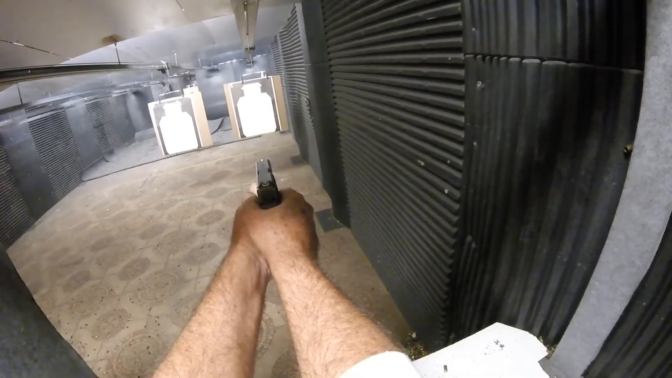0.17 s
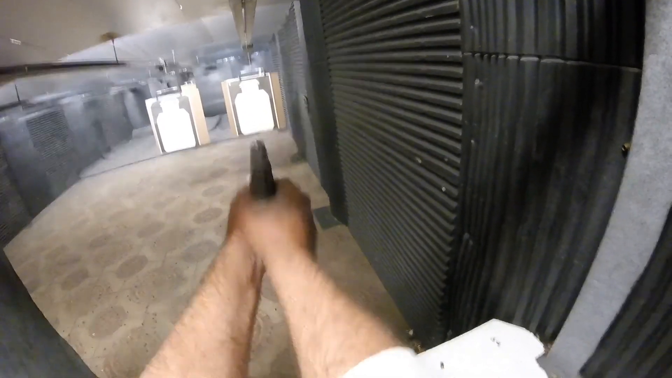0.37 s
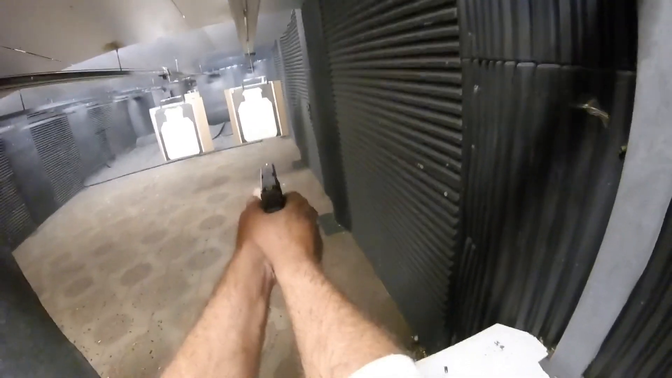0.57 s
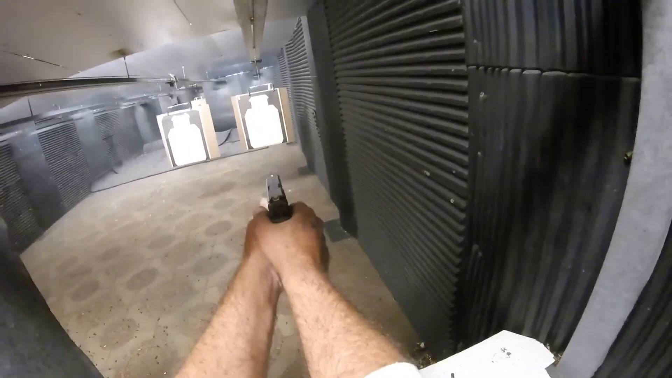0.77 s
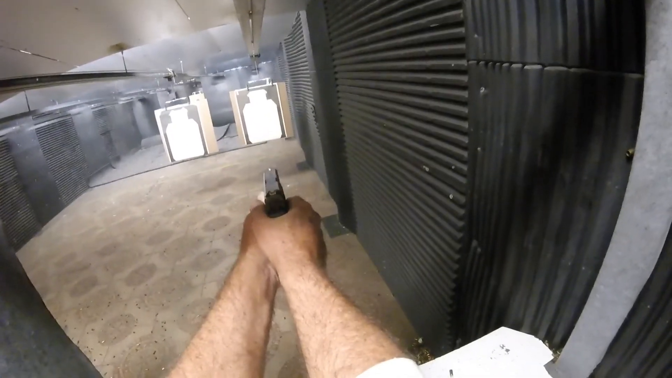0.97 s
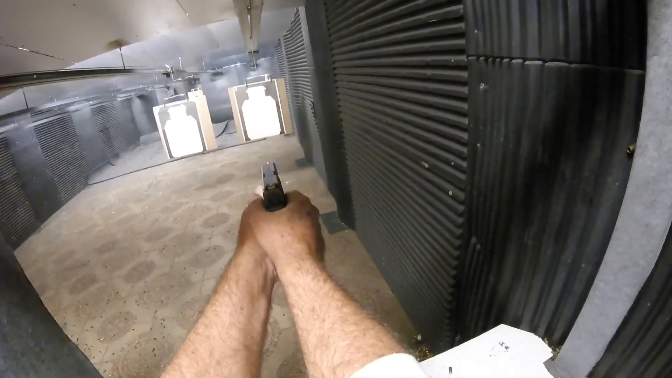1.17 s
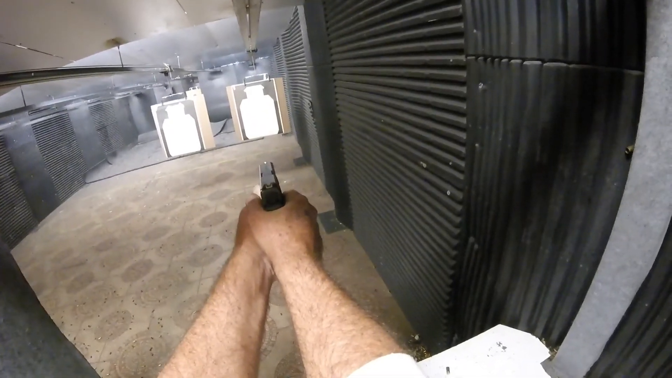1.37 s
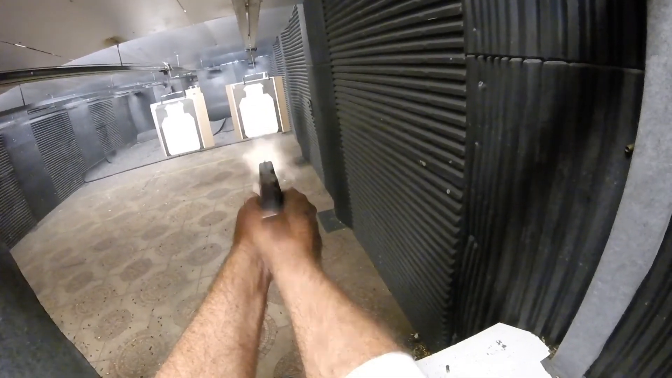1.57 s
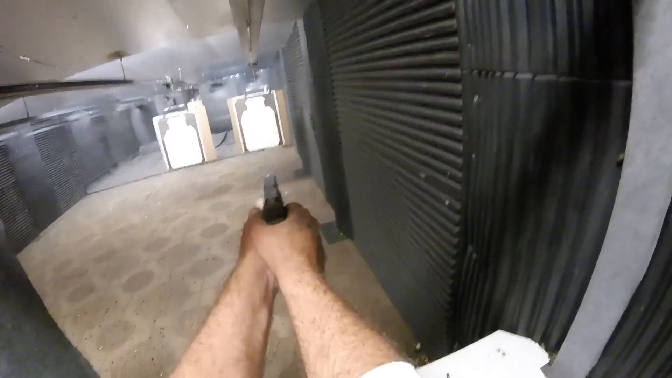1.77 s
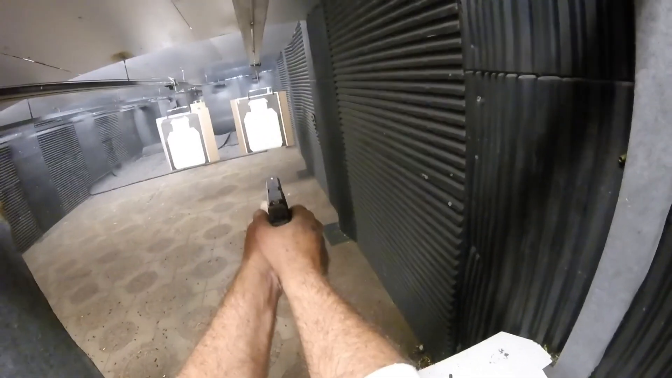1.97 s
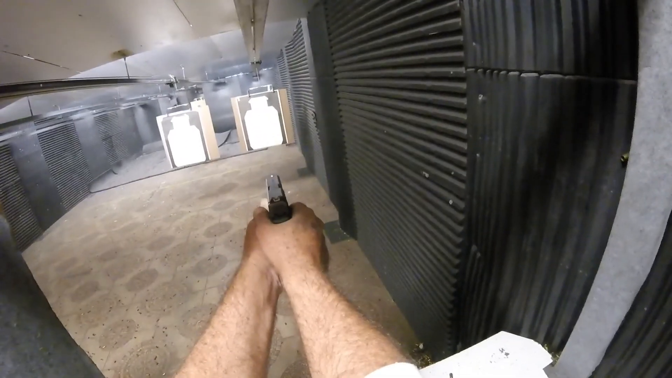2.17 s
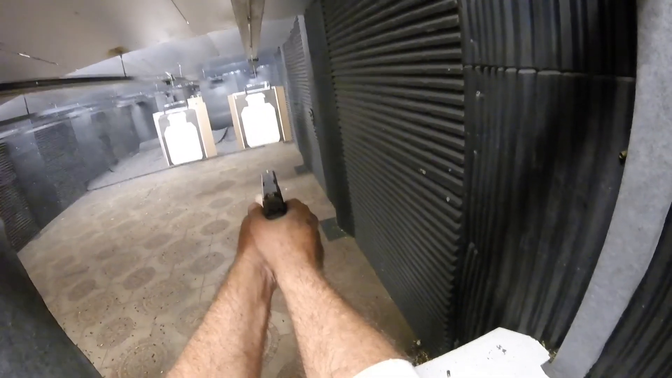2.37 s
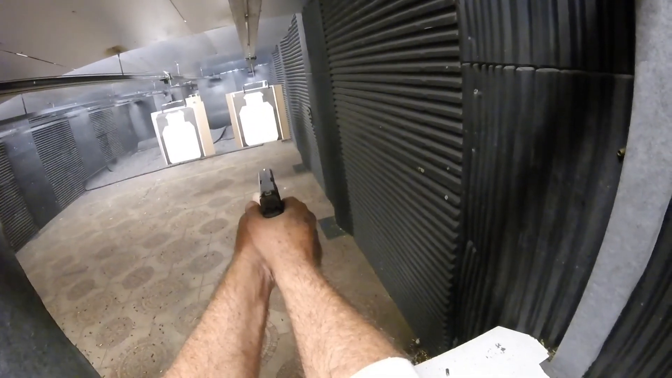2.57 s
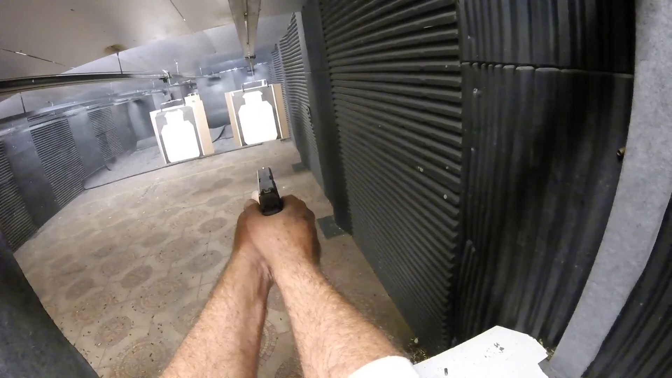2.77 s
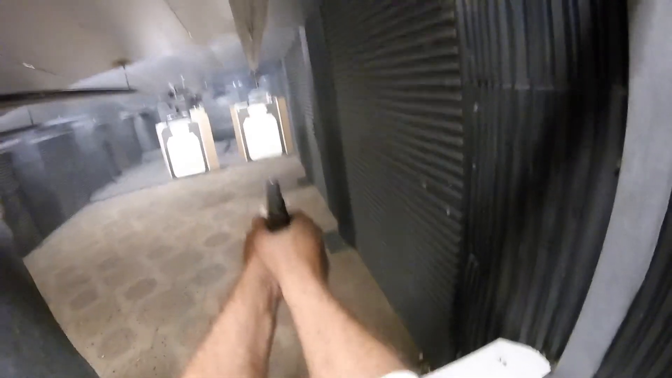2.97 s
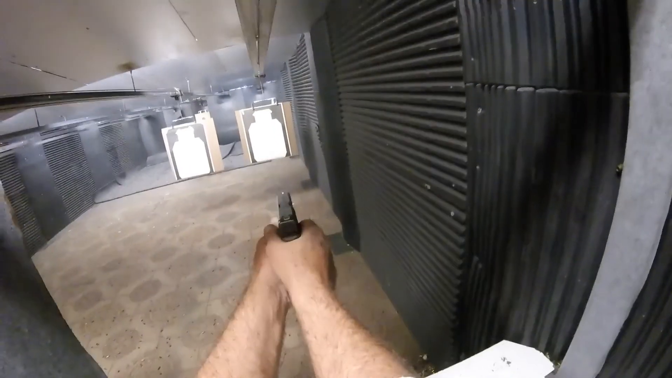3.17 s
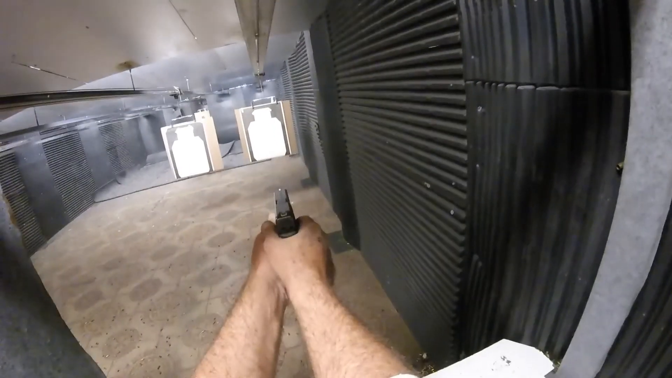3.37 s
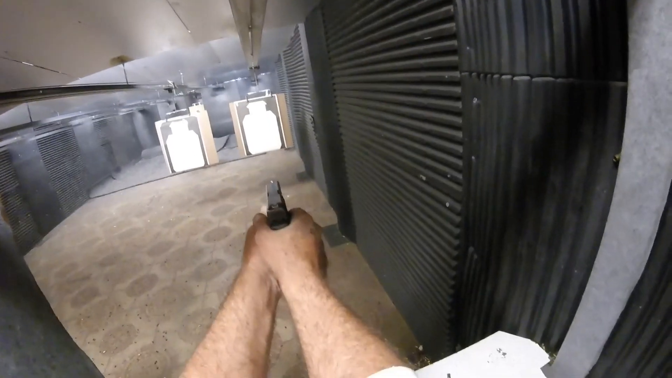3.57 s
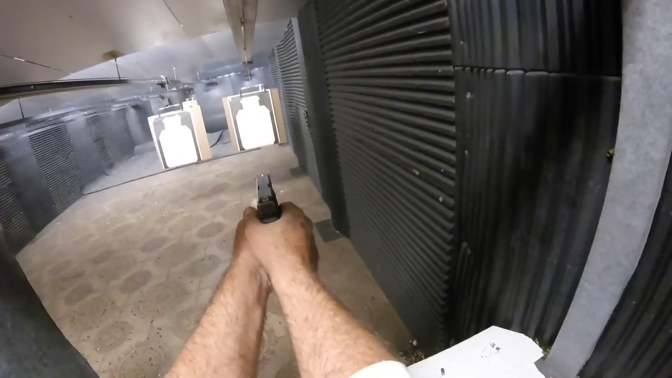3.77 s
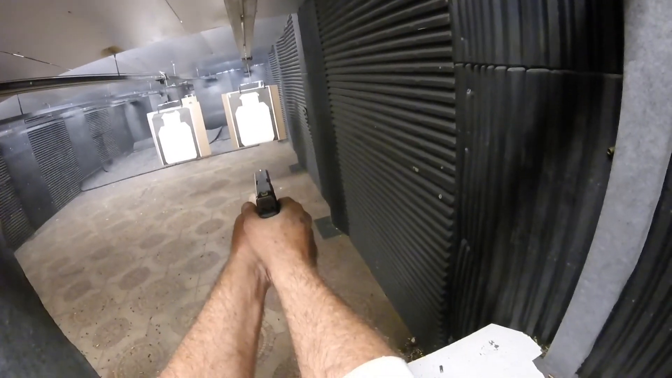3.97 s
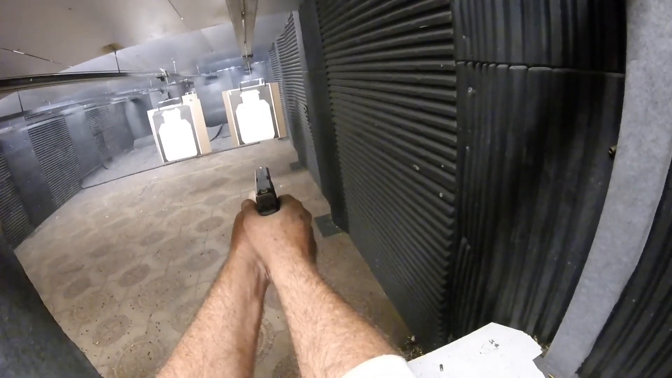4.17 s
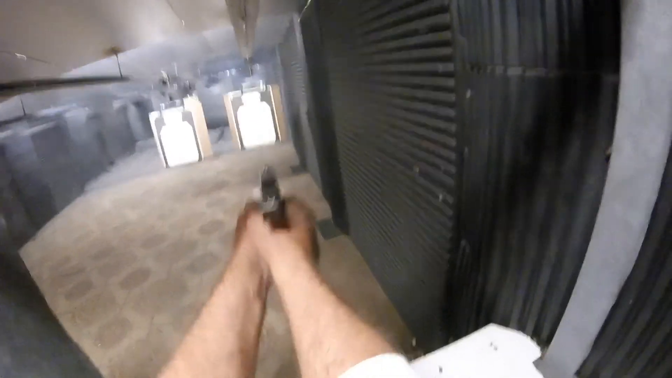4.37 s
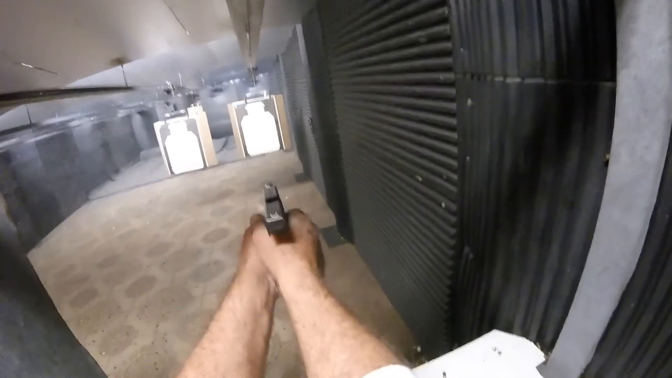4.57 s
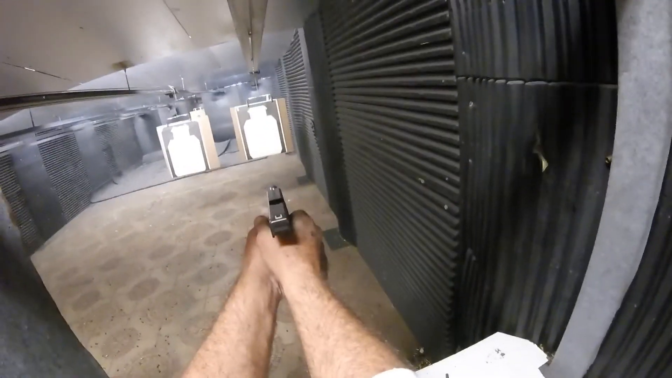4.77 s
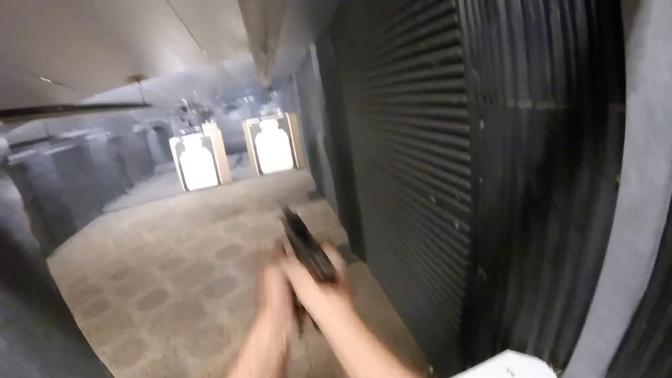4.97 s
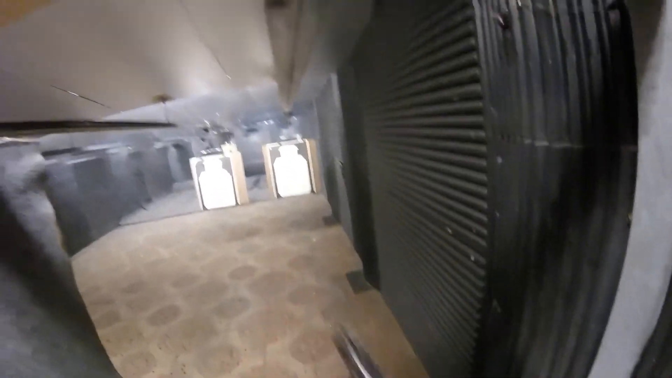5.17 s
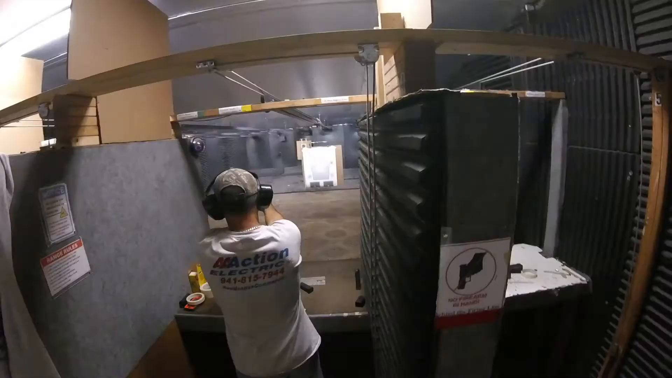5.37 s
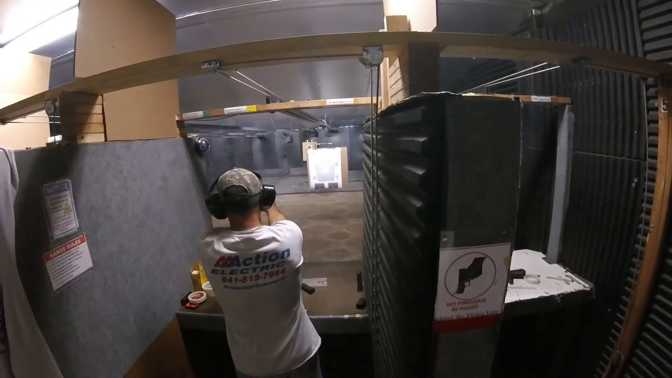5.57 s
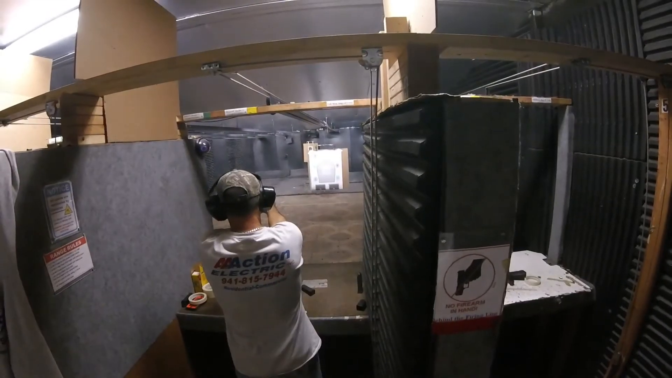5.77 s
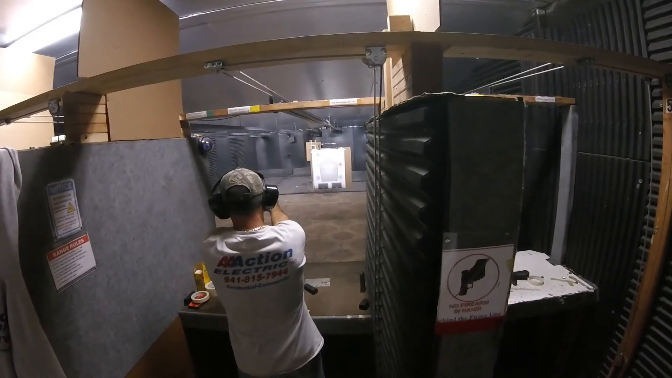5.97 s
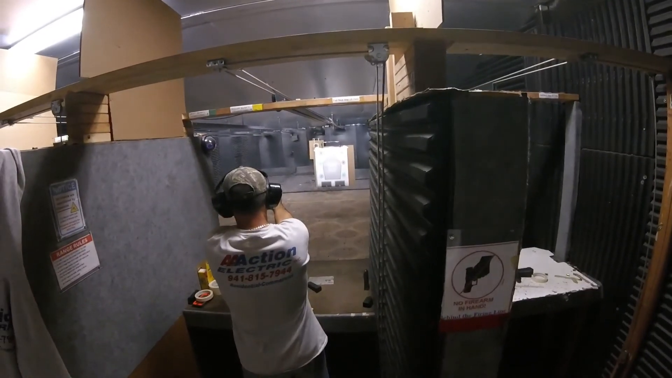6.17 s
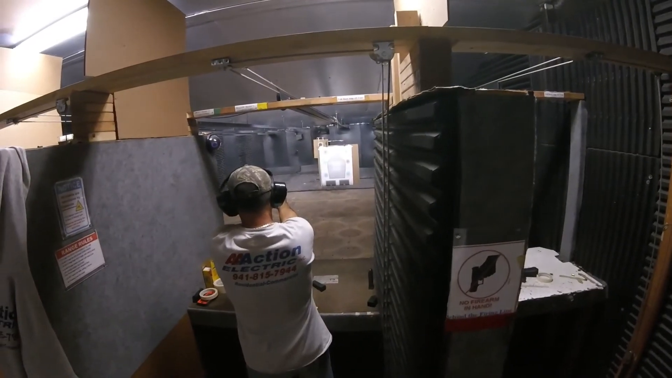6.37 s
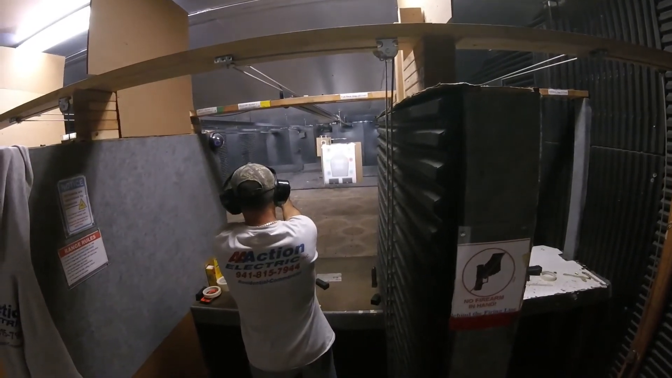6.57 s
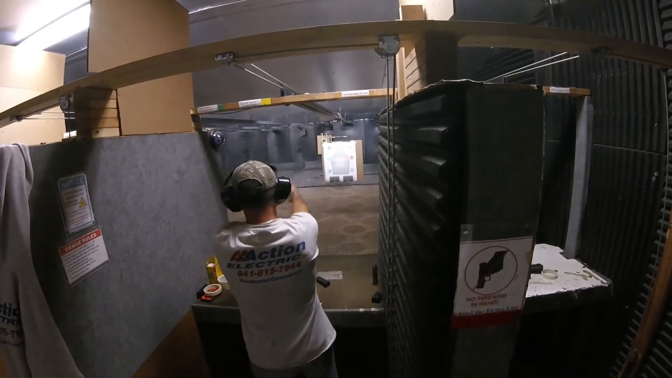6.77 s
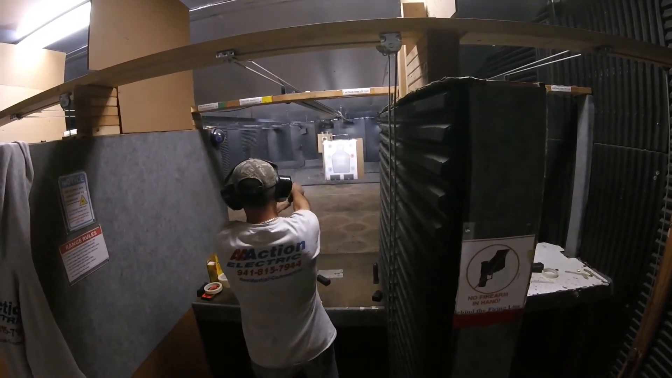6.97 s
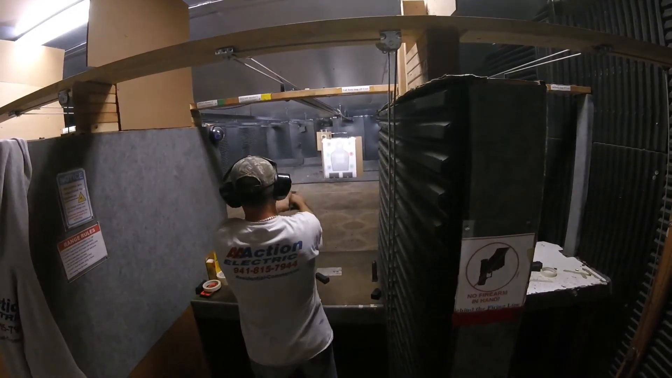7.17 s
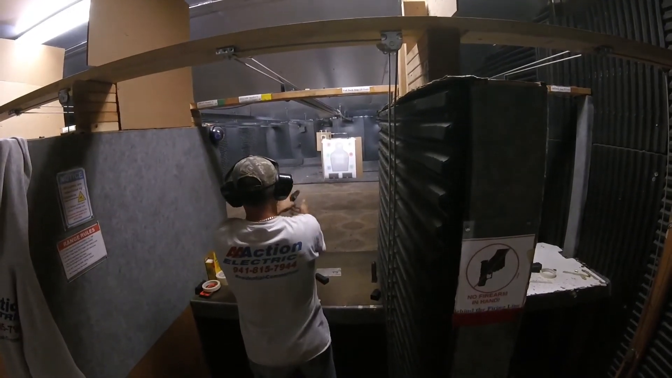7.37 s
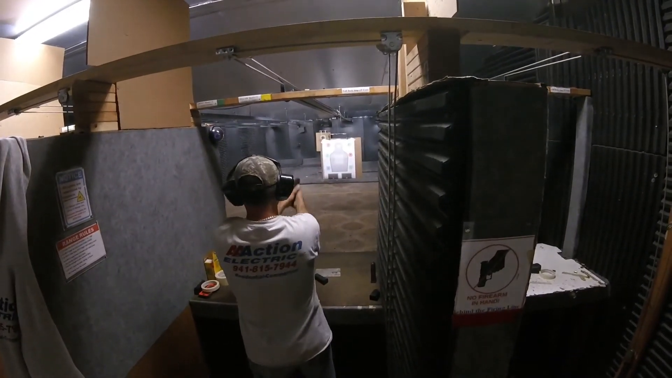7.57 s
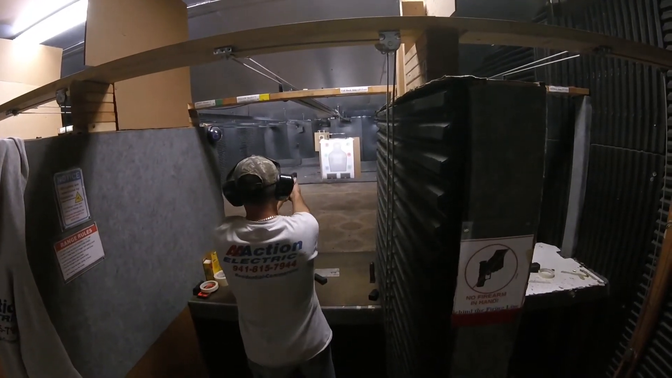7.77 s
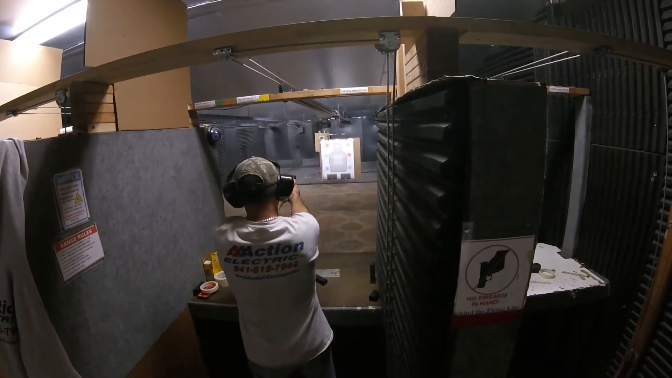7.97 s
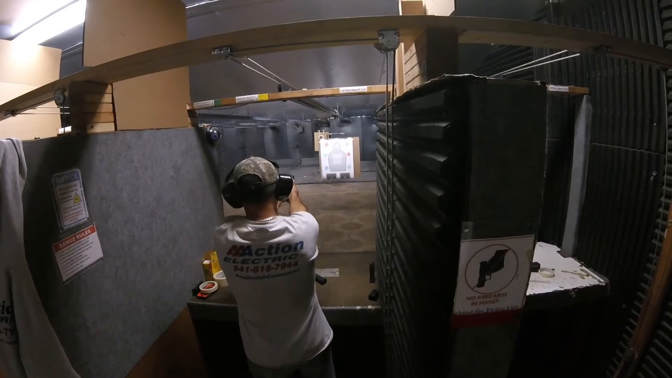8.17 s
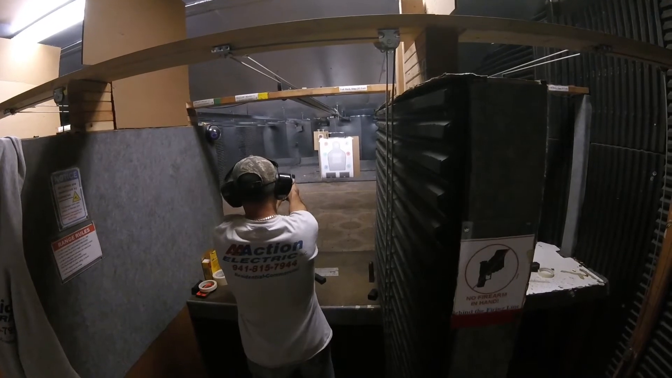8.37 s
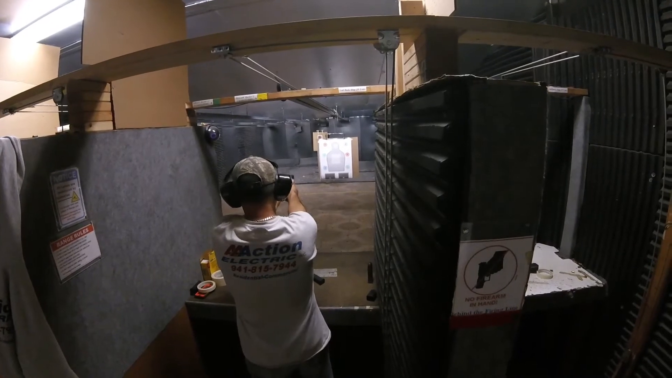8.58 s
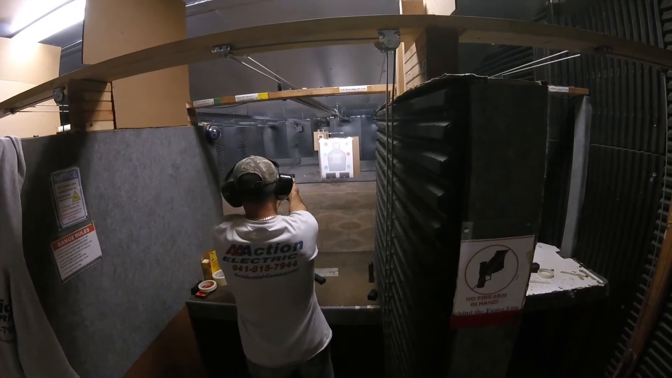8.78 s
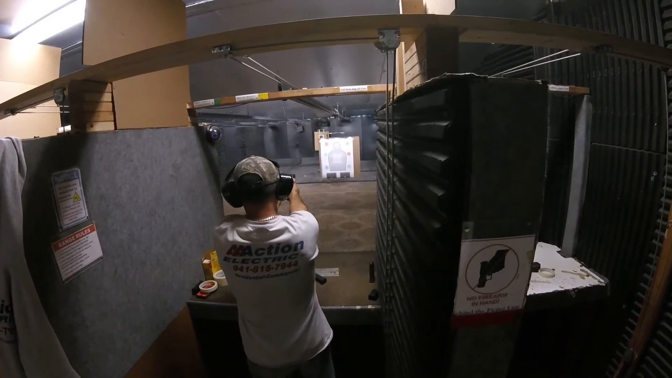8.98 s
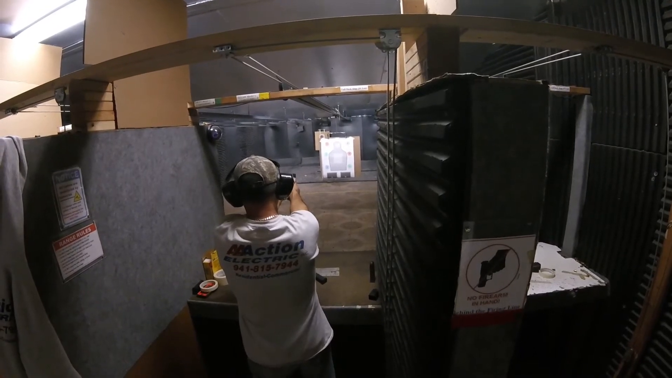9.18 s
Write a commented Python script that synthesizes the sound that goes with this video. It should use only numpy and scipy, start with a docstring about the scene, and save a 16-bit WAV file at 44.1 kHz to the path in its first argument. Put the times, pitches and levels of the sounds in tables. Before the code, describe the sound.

Four evenly spaced handgun shots crack and echo in a hard indoor range, cases tick on the floor, then a magazine and slide clack over fan hum.

```python
"""The echo of a pistol shot just fired dies over ventilation, then four more shots follow in a hard-walled indoor range.
Each blast stuns the head-worn microphone; on waking it takes in crack, slap, thump and echo, all shaped noise or sines.
Gain control lets the ventilation back as the echo fades. Spent cases tick on the floor: noise clicks with a brass ring.
A second microphone, behind the booth, then hears a magazine seated and the slide racked over the fan hum:
noise bursts and struck modes, with a room echo around them."""
import sys
import numpy as np
from scipy import signal
from scipy.fft import rfft, irfft
from scipy.io import wavfile
from scipy.ndimage import uniform_filter1d

SR = 44100
rng = np.random.default_rng(int(sys.argv[2]) if len(sys.argv) > 2 else 0)


def ratio_of_db(decibels):
    """Turn decibels (scalar or array-like) into linear amplitude factors; 0 dB maps to 1."""
    return 10 ** (np.asarray(decibels, float) / 20)


def materialize(psi):
    """Save the field psi as 16-bit PCM at rate SR to the path in sys.argv[1].

    A 1-D psi becomes a single channel; in a 2-D psi each row is a channel.
    """
    bounded = np.clip(np.atleast_2d(psi).T, -1, 1)
    quanta = np.round(bounded * 32767).astype(np.int16)
    wavfile.write(sys.argv[1], SR, quanta)


N = 406161  # length in samples
CUT_S = 5.389  # the place moves from the firing line to behind the booth

# Shots. Each row: blast in seconds, deafness of the microphone in seconds, level in dB, slap echo in dB to the crack.
SHOTS = [(-1.08, .045, 0, -6), (.354, .0513, 0, -8), (1.602, .0414, 0, -2.5), (2.850, .0415, 1.2, -14),
         (4.290, .039, 0, -6)]
# Spectrum of the long echo. Each row: frequency in Hz, density in dB per Hz.
ECHO = [(24, -22), (50, -7), (100, 0), (150, -5), (205, -6), (270, -3.5), (400, -5), (600, -3.5),
        (1000, -5), (1400, -8), (1650, -11), (2000, -12.5), (3200, -15), (5850, -23), (6620, -35),
        (9700, -45), (11800, -58), (13000, -100)]
# Decay of the long echo. Each row: frequency in Hz, time to fall 60 dB in seconds.
ECHO_T60 = [(60, .5), (120, .5), (200, .9), (280, 1.5), (350, 1.75), (700, 1.7), (1500, 1.85), (3500, 1.53),
            (6000, 1.35), (9000, .9), (13000, .6)]
# Resonances of the range. Each row: frequency in Hz, width in Hz, lift in dB.
ROOM_PEAKS = [(279, 14, 4), (338, 14, 5), (377, 20, 5), (495, 18, 5), (533, 18, 5), (619, 18, 4),
              (672, 18, 4), (798, 18, 3), (967, 16, 5), (1159, 20, 3)]
# Spectrum of the close booth reflections. Each row: frequency in Hz, density in dB per Hz.
CRACK = [(59, -36), (100, -6), (843, 0), (1430, -7), (2750, -6), (3850, -12), (5630, -10), (9740, -28),
         (12800, -43), (15500, -69)]
# Ventilation hiss at the firing line. Each row: frequency in Hz, density in dB per Hz.
NEAR_AIR = [(12, -39), (20, -2), (58, 0), (100, -4), (130, -10), (200, -23), (400, -24), (1000, -35),
            (1490, -36), (2000, -50), (2750, -55), (7000, -66), (12000, -74), (15600, -100)]
# Hum at the firing line. Each row: frequency in Hz, width in Hz, level in dB.
NEAR_HUM = [(60, 15, -50)]
# Whine at the firing line. Each row: frequency in Hz, width in Hz, level in dB before WHINE_LEVEL.
NEAR_WHINE = [(1437, 12, -60), (1513, 20, -64)]
# Course of the whine. Each row: time in seconds, gain in dB.
WHINE_LEVEL = [(0, -4), (.35, -4), (3.55, -1), (3.85, 3), (4.3, 2), (5.3, 0)]
# Spent cases and small parts landing. Each row: start in seconds, level in dB, brass ring in dB to the click.
TICKS = [(.089, -53, -18), (.195, -51, -9), (.884, -45, -40), (.985, -46, -40), (1.0445, -30, -42),
         (2.314, -31, -26), (2.637, -51, -22), (2.709, -43, -22), (2.797, -54, -30), (3.586, -33, -34),
         (3.895, -49, -10), (4.12, -61, -30), (5.0444, -26, -26), (5.239, -50, -30)]
# Spectrum of the landing click. Each row: frequency in Hz, density in dB per Hz.
TICK = [(700, -30), (1200, -8), (2000, 0), (3200, 0), (5500, -1), (6500, -12), (9800, -26), (11000, -42),
        (14000, -70)]
# Modes of a brass case. Each row: frequency in Hz, level in dB, time to fall 60 dB in seconds.
BRASS = [(5250, -6, .25), (5800, -4, .1), (6100, -8, .2), (11380, -14, .35), (11470, -21, .2)]
# Cases rolling out after a bounce. Each row: start in seconds, level in dB, time to fall 60 dB in seconds.
ROLLS = [(.089, -62, 1.2), (.195, -60, 1.0), (3.895, -62, .8), (5.05, -52, 1.0)]
# Spectrum of the rolling. Each row: frequency in Hz, density in dB per Hz.
ROLL = [(2000, -30), (4200, -8), (5000, 0), (6100, 0), (6800, -12), (9000, -18), (12000, -40)]
# Small clicks just as the microphone is stunned. Each row: start in seconds, level in dB.
ARRIVALS = [(2.849, -44), (4.289, -46)]
# Ventilation hiss behind the booth. Each row: frequency in Hz, density in dB per Hz.
FAR_AIR = [(120, -30), (170, -5), (290, -8), (420, -10), (650, -13), (1000, -18), (2200, -25), (3300, -31),
           (5000, -36), (7300, -36), (9700, -42), (12000, -46), (15000, -52)]
# Fan tones behind the booth. Each row: frequency in Hz, width in Hz, level in dB before FAR_LEVEL.
FAR_TONES = [(30, 9, 1), (68, 30, -6), (100, 30, -12), (136, 16, -7), (511, 8, -32)]
# Level of the background behind the booth: it drops just after the slide goes home, then slowly comes back.
# Each row: time in seconds, gain in dB.
FAR_LEVEL = [(5.39, -38), (7.2, -38.5), (7.35, -45), (7.7, -43), (9.2, -40.5)]
# Metal sliding on metal. Each row: start in seconds, seconds to the peak, seconds after it, peak in dB.
SCRAPES = [(6.425, .02, .024, -57), (7.104, .02, .05, -31), (7.185, .008, .048, -31)]
# Magazine seated, slide back, slide home. Each row: start in seconds, level in dB, rise in seconds,
# time for the clatter to fall 60 dB in seconds, strongest frequency in Hz, low knock in dB, ring in dB.
CLACKS = [(6.47, -17, .003, .13, 2800, -27, -6), (7.173, -10, .004, .045, 4500, -10, -6),
          (7.295, -11.5, .0015, .065, 3600, -19, -4)]
# Spectrum of parts clattering. Each row: frequency in Hz, density in dB per Hz.
CLATTER = [(530, -40), (860, -20), (1400, -10), (2200, -9), (3400, -7), (6000, -9), (7000, -22),
           (10000, -27), (11300, -38), (12300, -65), (14000, -80)]
# Spectrum of the low knock. Each row: frequency in Hz, density in dB per Hz.
KNOCK = [(150, -30), (300, -10), (500, -9), (700, 0), (1200, -4), (2500, -40)]
# Modes struck by the magazine. Each row: frequency in Hz, level in dB, time to fall 60 dB in seconds.
MAGAZINE = [(1300, -9, .03), (1920, -9, .03), (2380, -3, .04), (2570, -5, .04), (2920, 0, .05),
            (3180, -3, .04), (3530, -2, .03), (4060, -5, .04), (4480, -3, .06), (5050, -12, .02),
            (5850, -6, .025)]
# Modes struck by the slide going back. Each row: frequency in Hz, level in dB, time to fall 60 dB in seconds.
FRAME = [(800, -3, .025), (1200, -5, .03), (1780, -3, .04), (2270, -5, .03), (2760, -3, .035),
         (3380, -2, .06), (4200, -3, .025), (4600, 0, .025), (5820, 0, .025)]
# Modes struck by the slide going home. Each row: frequency in Hz, level in dB, time to fall 60 dB in seconds.
STEEL = [(1362, -4, .07), (1750, -6, .04), (2005, -5, .1), (2300, -6, .04), (2700, -10, .04),
         (2930, -6, .05), (3040, -5, .06), (3880, -3, .12), (3960, -5, .22), (4035, -9, .4),
         (4080, -5, .18), (4150, -3, .12), (4600, -8, .02), (5400, -1, .02), (5800, -1, .02),
         (6900, -12, .025), (8150, -14, .03), (9870, -16, .03), (10150, -18, .03)]
# Small taps of part on part. Each row: start in seconds, level in dB, pitch in Hz, time to fall 60 dB in seconds.
TAPS = [(7.118, -30, 4300, .02), (7.130, -24, 3120, .03), (7.144, -27, 3340, .02), (7.223, -28, 2800, .02),
        (7.277, -25, 4200, .025)]
# Decay of the room around the booth. Each row: frequency in Hz, time to fall 60 dB in seconds.
BOOTH_T60 = [(500, .6), (1300, .95), (3500, .92), (6000, .85), (9000, .7), (11200, .5), (12200, .08)]
# Response of the microphones. Each row: frequency in Hz, gain in dB.
MICROPHONE = [(20, 0), (11000, 0), (13500, -8), (15000, -30), (16000, -70)]


def evened(x):
    """Scales to rms 1."""
    return x / np.sqrt(np.mean(x ** 2) + 1e-20)


def read(points, hz):
    """Reads a table on a log-frequency axis."""
    f, value = np.transpose(points)
    return np.interp(np.log(hz + 1), np.log(f + 1), value)


def course(points, t):
    """Reads a table of decibels over time as a gain."""
    return ratio_of_db(np.interp(t, *np.transpose(points)))


def add(mix, s, sound):
    """Mixes a sound in at s seconds, which may lie before zero."""
    at = round(s * SR)
    sound = sound[max(-at, 0):]
    part = mix[max(at, 0):][:len(sound)]
    part += sound[:len(part)]


def filtered(x, colour):
    """Applies a table of decibels over frequency."""
    size = x.shape[-1]
    return irfft(rfft(x) * ratio_of_db(read(colour, np.fft.rfftfreq(size, 1 / SR))), size)


def noise(size, colour):
    """Noise of rms 1 with a given spectrum."""
    return evened(filtered(rng.standard_normal(size), colour))


def uneven(size, width, spread_db):
    """A gain that wanders smoothly by chance over about width samples."""
    wander = signal.fftconvolve(rng.standard_normal(size), np.hanning(round(width)), "same")
    return ratio_of_db(spread_db * evened(wander))


def dying(x, t60):
    """Lets each band of x die at its own speed."""
    hz, t, z = signal.stft(x, SR, nperseg=512)
    decay = ratio_of_db(-60 * t / read(t60, hz)[:, None])
    return signal.istft(z * decay, SR, nperseg=512)[1][:len(x)]


def resonant(x):
    """Lifts the resonances of the range, where the room holds on to the sound."""
    hz = np.fft.rfftfreq(len(x), 1 / SR)
    lift_db = sum(db / (1 + (2 * (hz - f) / width) ** 2) for f, width, db in ROOM_PEAKS)
    return irfft(rfft(x) * ratio_of_db(lift_db), len(x))


def long_echo(same_room, t):
    """Dense wall reflections as dying noise; the lows swell in from the far end, the highs only fade."""
    alike = .9  # how much of the echo pattern all shots share
    pattern = alike * same_room + np.sqrt(1 - alike ** 2) * noise(len(t), ECHO)
    echo = dying(resonant(pattern), ECHO_T60)
    echo *= uneven(len(t), .05 * SR, .7)  # it surges and sinks as it dies
    low = signal.sosfiltfilt(signal.butter(1, 1200, fs=SR, output="sos"), echo)
    # the far end of the range takes a while to answer
    late, arrives_s, swell_s = .62, .03, .008
    swell = 1 - late / (1 + np.exp((t - arrives_s) / swell_s))
    swell *= 1 + .6 * np.exp(-(t / .075) ** 2)  # the near walls die first
    bright_walls = 1 + .4 * np.exp(-t / .12)
    return ratio_of_db(-7.3) * (low * swell + (echo - low) * bright_walls)


def crack_and_slap(slap_db, t):
    """Close booth reflections: a short noise burst, then the same noise in a brief slap echo."""
    crack = noise(len(t), CRACK)
    rise_s, fade_s, slap_s, slap_width_s = .0006, .007, .0222, .0012
    early = ratio_of_db(4.5) * crack * np.exp(-t / fade_s) * np.minimum(t / rise_s, 1)
    slap = ratio_of_db(slap_db) * crack * np.exp(-((t - slap_s) / slap_width_s) ** 2)
    return early + slap


def pressure_thump(t):
    """A low sine whose pitch sags as it dies."""
    start_hz, sag_s, fade_s = 75, .025, .013
    cycles = start_hz * sag_s * (1 - np.exp(-t / sag_s))
    return ratio_of_db(7) * np.sin(2 * np.pi * cycles) * np.exp(-t / fade_s)


def shots():
    """What is left of each blast once the microphone wakes: long echo, crack, slap echo, pressure thump."""
    mix, t = np.zeros(N), np.arange(2 * SR) / SR
    same_room = noise(len(t), ECHO)
    for s, dead_s, db, slap_db in SHOTS:
        blast = long_echo(same_room, t) + crack_and_slap(slap_db, t) + pressure_thump(t)
        add(mix, s + dead_s, ratio_of_db(db) * blast)
    return mix


def fuzzy_tones(tones):
    """Narrow bands of noise: fan tones that waver."""
    hz, spectrum = np.fft.rfftfreq(N, 1 / SR), 0
    for f, width, db in tones:
        peak = 1 / (1 + (2 * (hz - f) / width) ** 2)
        spectrum = spectrum + ratio_of_db(db) * peak / np.sqrt((peak ** 2).sum() * 2 / N)
    return irfft(rfft(rng.standard_normal(N)) * spectrum, N)


def near_ventilation(t):
    """Moving air as shaped noise at the firing line, with a wavering hum and whine."""
    whine = fuzzy_tones(NEAR_WHINE) * course(WHINE_LEVEL, t)
    return ratio_of_db(-43.5) * noise(N, NEAR_AIR) + fuzzy_tones(NEAR_HUM) + whine


def ring(modes, t):
    """Struck modes with chance phases, each dying exponentially."""
    total = 0
    for hz, db, t60 in modes:
        total = total + ratio_of_db(db - 60 * t / t60) * np.sin(2 * np.pi * (hz * t + rng.random()))
    return total


def landing_cases():
    """Each impact on the floor: a short dry noise click, a little room, a ring of brass modes."""
    mix, t = np.zeros(N), np.arange(SR // 2) / SR
    click_s, room_db, room_s, rise_s = .004, -19, .1, .0012
    for s, db, ring_db in TICKS:
        shape = np.exp(-t / click_s) + ratio_of_db(room_db) * np.exp(-t / room_s)
        click = noise(len(t), TICK) * shape * np.minimum(t / rise_s, 1)
        add(mix, s, ratio_of_db(db) * (click + ratio_of_db(ring_db) * ring(BRASS, t)))
    return mix


def rolling_cases():
    """Cases roll on after a bounce: bright noise that fades for half a second."""
    mix, t = np.zeros(N), np.arange(SR // 2) / SR
    for s, db, t60 in ROLLS:
        add(mix, s, ratio_of_db(db - 60 * t / t60) * noise(len(t), ROLL) * np.minimum(t / .01, 1))
    return mix


def arrivals():
    """Two-millisecond snips of noise just as the microphone is stunned."""
    mix = np.zeros(N)
    for s, db in ARRIVALS:
        add(mix, s, ratio_of_db(db) * noise(SR // 10, CRACK)[:SR // 500])
    return mix


def far_ventilation(t):
    """Behind the booth: air noise, wavering fan tones and a steady mains hum under one level."""
    hum = ratio_of_db(-12) * np.sin(2 * np.pi * 239.5 * t)
    air = ratio_of_db(-14) * noise(N, FAR_AIR) + fuzzy_tones(FAR_TONES) + hum
    fade_in = np.clip((t - CUT_S) / .006, 0, 1)
    return air * course(FAR_LEVEL, t) * fade_in


def scrapes():
    """Steel slides on steel: gritty noise that grows to a peak and falls off."""
    mix = np.zeros(N)
    start_db, end_db = -24, -10  # against the peak
    for s, rise, fall, db in SCRAPES:
        during = np.arange(0, rise + fall, 1 / SR)
        stroke_db = db + np.interp(during, [0, rise, rise + fall], [start_db, 0, end_db])
        grit = uneven(len(during), 80, 3)
        add(mix, s, ratio_of_db(stroke_db) * evened(grit * noise(SR, CLATTER)[:len(during)]))
    return mix


def clacks():
    """Steel parts strike home: clatter with a hump at its strongest pitch, a low knock, ringing modes."""
    mix, t = np.zeros(N), np.arange(SR) / SR
    hump_db, hump_width = 7, .35  # width on a natural-log frequency axis
    for (s, db, rise, t60, hz, knock_db, ring_db), modes in zip(CLACKS, (MAGAZINE, FRAME, STEEL)):
        knock = ratio_of_db(knock_db) * noise(SR, KNOCK)
        rattle = uneven(SR, 110, 2.5)  # parts settle unevenly
        f = np.geomspace(500, 14000, num=40)
        hump = hump_db * np.exp(-(np.log(f / hz) / hump_width) ** 2)
        colour = np.column_stack([f, read(CLATTER, f) + hump])
        clatter = (noise(SR, colour) * rattle + knock) * ratio_of_db(-60 * t / t60)
        clack = clatter + ratio_of_db(ring_db) * ring(modes, t)
        add(mix, s, ratio_of_db(db) * clack * np.minimum(t / rise, 1))
    return mix


def taps():
    """Parts tap each other: a noise tick and one struck mode."""
    mix, t = np.zeros(N), np.arange(SR) / SR
    for s, db, hz, t60 in TAPS:
        tick = .5 * noise(SR, CLATTER) * np.exp(-t / .002)
        add(mix, s, ratio_of_db(db) * (tick + ring([(hz, 0, t60)], t)) * np.minimum(t / .001, 1))
    return mix


def booth_echo(parts):
    """The range answers: three echo patterns take turns, so no two clacks echo alike."""
    t, wet = np.arange(SR) / SR, np.zeros(N)
    turn = 2 * np.pi * 25 * np.arange(N) / SR  # 25 turns a second
    for k in range(3):
        room = dying(rng.standard_normal(SR), BOOTH_T60) * np.minimum(t / .015, 1)
        share = np.sqrt(2 / 3) * np.cos(turn + 2 * np.pi * k / 3)
        wet += signal.fftconvolve(parts * share, room / np.linalg.norm(room))[:N]
    return ratio_of_db(-7) * wet


def handling():
    """Magazine and slide: scrapes, clacks and taps, dry and with the echo of the room."""
    parts = scrapes() + clacks() + taps()
    return parts + booth_echo(parts)


def scene():
    """Firing line first, then the place behind the booth."""
    t = np.arange(N) / SR
    near = shots() + near_ventilation(t) + landing_cases() + rolling_cases() + arrivals()
    far = far_ventilation(t) + handling()
    return np.where(t < CUT_S, near, far)[None]


def awake(t):
    """The stunned microphone: a gain that drops to nothing at each blast and snaps back."""
    gain, stun_s = np.ones(N), .003  # how fast it goes deaf
    for s, dead_s, *_ in SHOTS:
        going_deaf = np.clip((s + stun_s / 2 - t) / stun_s, 0, 1)
        gain *= np.where(t < s + dead_s, going_deaf, 1)
    return gain


def over(level_db, threshold_db, slope, most_db):
    """Decibels to cut: follows the level above a threshold, causally smoothed."""
    cut_db = np.clip(slope * (level_db - threshold_db), 0, most_db)
    return uniform_filter1d(cut_db, size=2000, origin=999)


def gain_control(dry, t):
    """Turns the bass, then everything, down while the firing line is loud; includes the stunned gaps."""
    level_db = 10 * np.log10(abs(uniform_filter1d(dry[0] ** 2, size=4000)) + 1e-12)
    level_db -= 200 * (t > CUT_S)  # no control behind the booth
    bass = signal.sosfiltfilt(signal.butter(2, 190, fs=SR, output="sos"), dry)
    # the bass stays down until the echo has faded
    held_bass = bass * ratio_of_db(-over(level_db, -37.5, 1.4, 9.5))
    steadied = (dry - bass + held_bass) * awake(t)
    return steadied * ratio_of_db(-over(level_db, -37, .6, 12))


def roll_off(x):
    """The treble ends steeply here."""
    return signal.sosfilt(signal.butter(12, 15700, fs=SR, output="sos"), x)


def record(dry):
    """Stunned microphone with gain control, soft overload, the microphone's treble loss, low cut at 30 Hz."""
    steadied = gain_control(dry, np.arange(N) / SR)
    overloaded = .72 * np.tanh(steadied / .72)
    heard = filtered(overloaded, MICROPHONE)
    mix = signal.lfilter([1, -1], [1, -np.exp(-2 * np.pi * 30 / SR)], heard)
    return roll_off(mix)


dry = scene()
out = record(dry)
materialize(out)
```